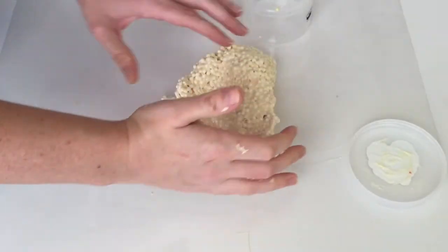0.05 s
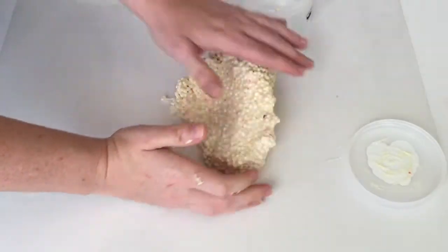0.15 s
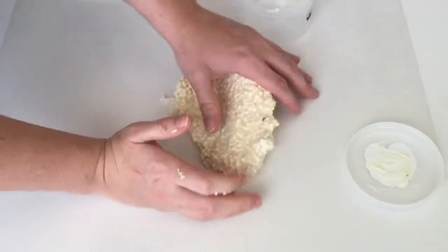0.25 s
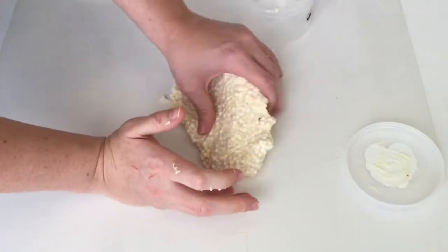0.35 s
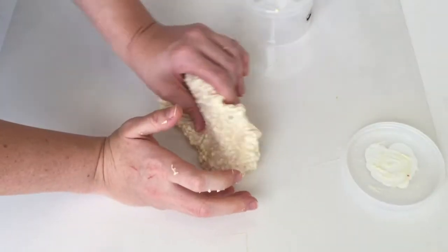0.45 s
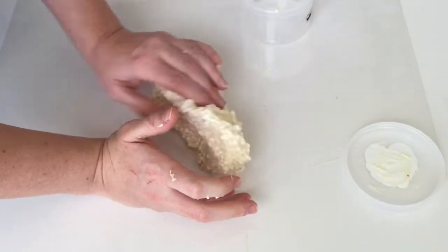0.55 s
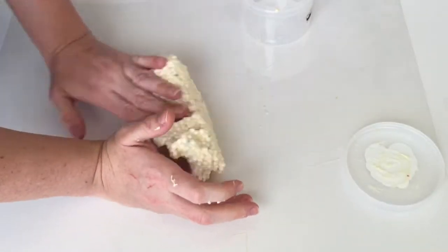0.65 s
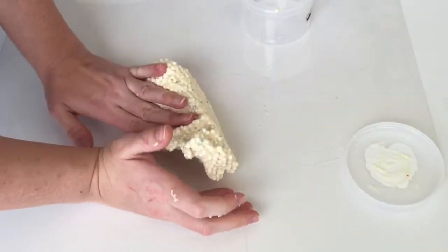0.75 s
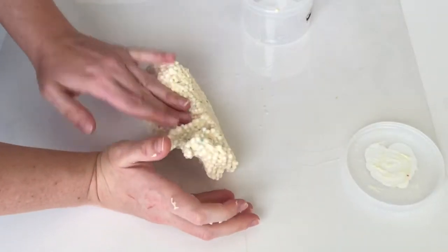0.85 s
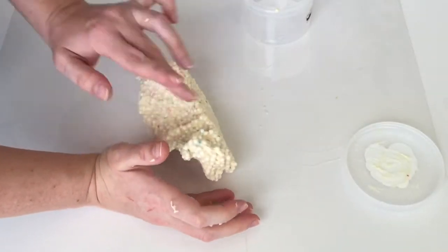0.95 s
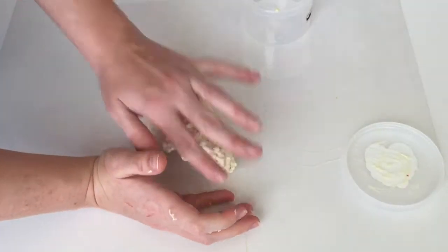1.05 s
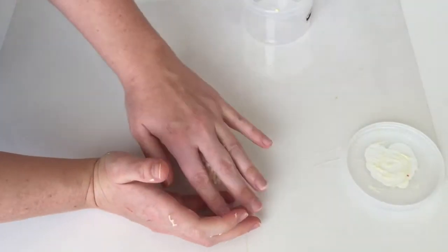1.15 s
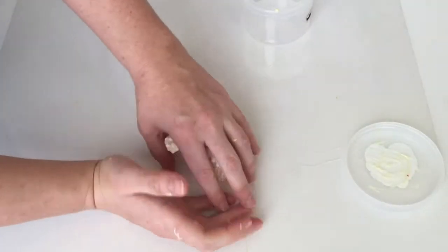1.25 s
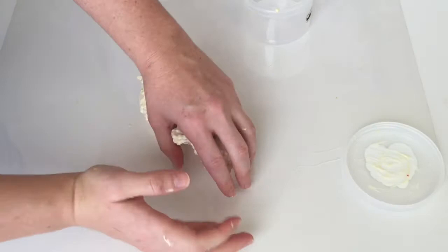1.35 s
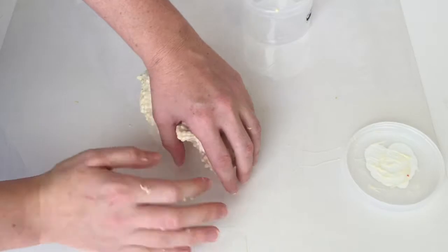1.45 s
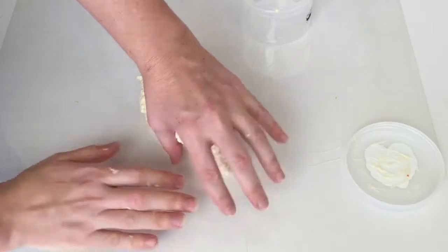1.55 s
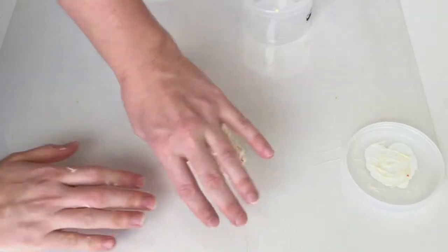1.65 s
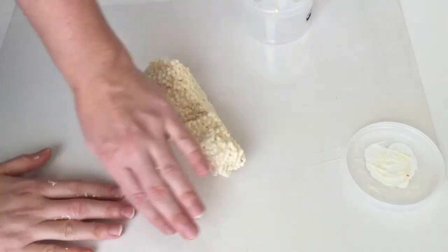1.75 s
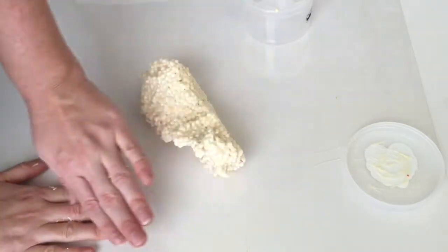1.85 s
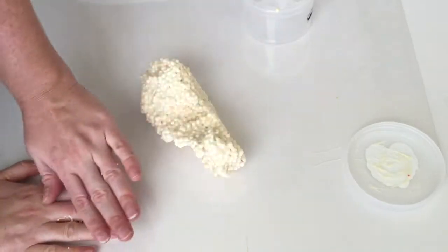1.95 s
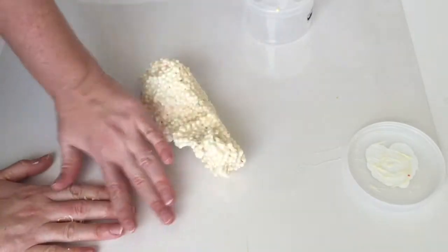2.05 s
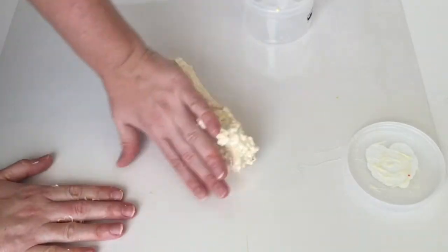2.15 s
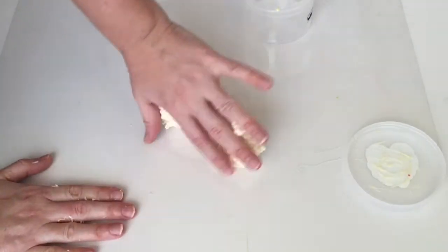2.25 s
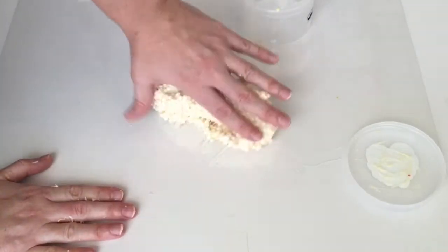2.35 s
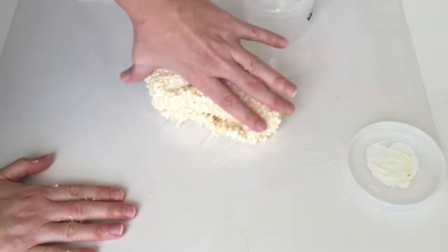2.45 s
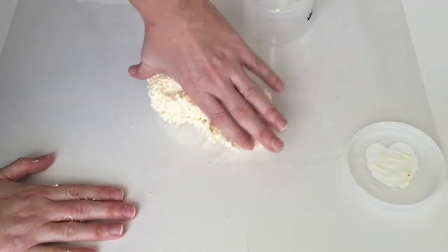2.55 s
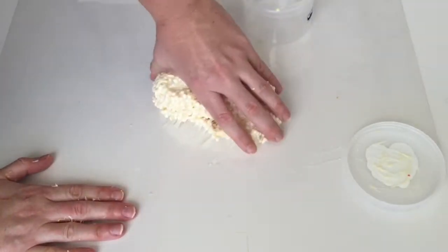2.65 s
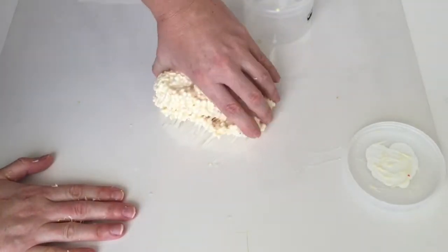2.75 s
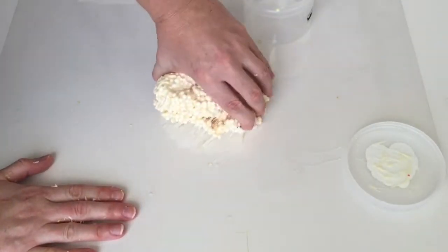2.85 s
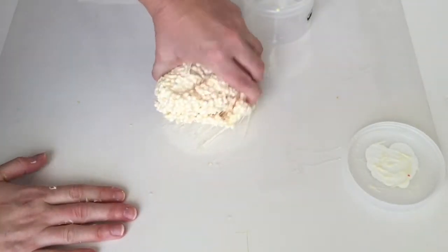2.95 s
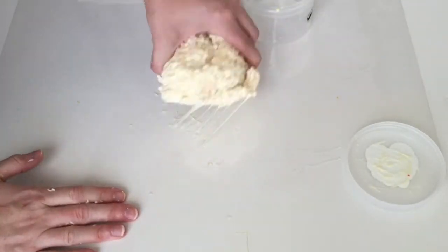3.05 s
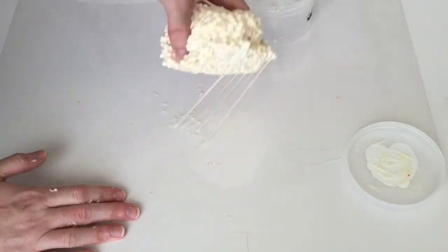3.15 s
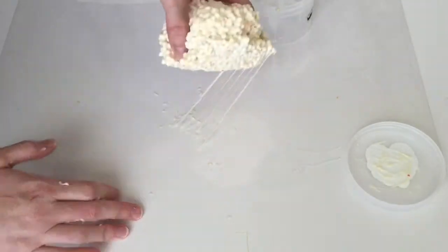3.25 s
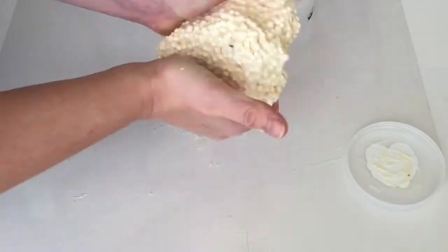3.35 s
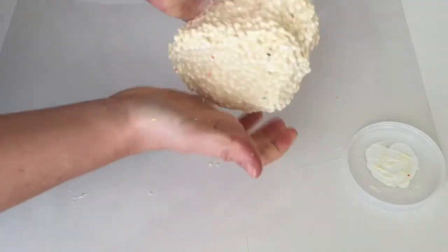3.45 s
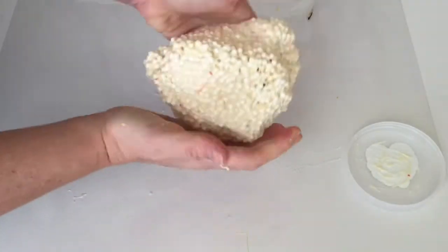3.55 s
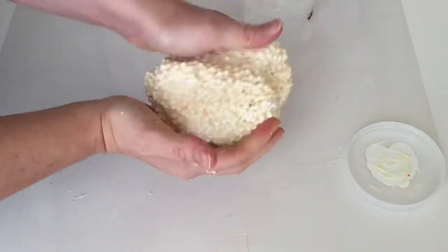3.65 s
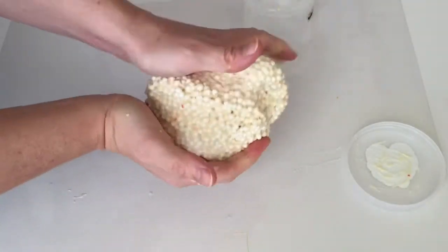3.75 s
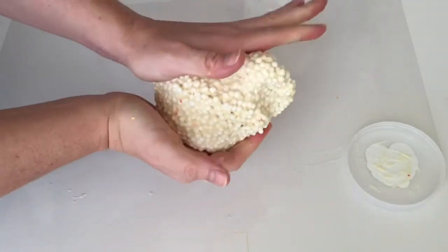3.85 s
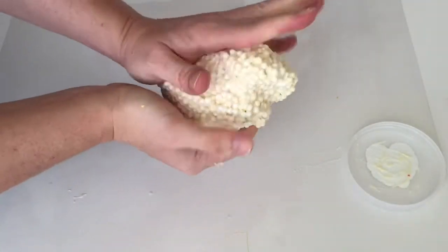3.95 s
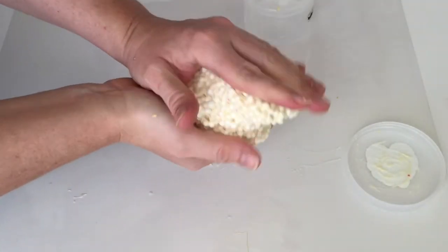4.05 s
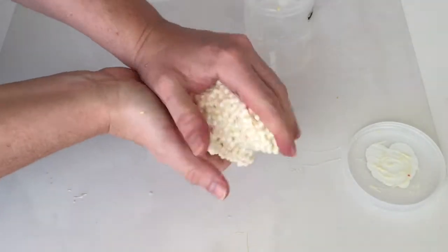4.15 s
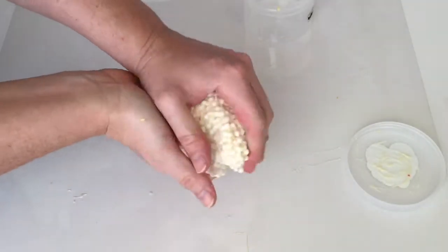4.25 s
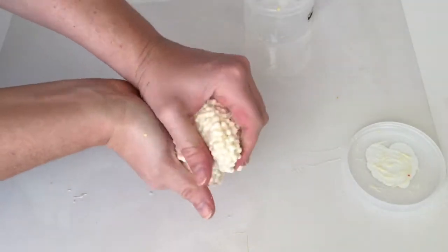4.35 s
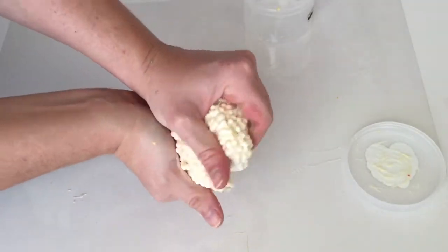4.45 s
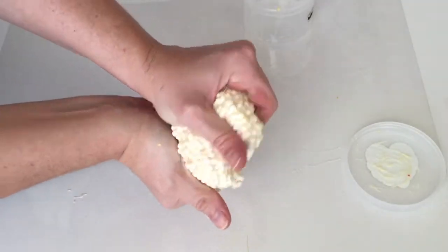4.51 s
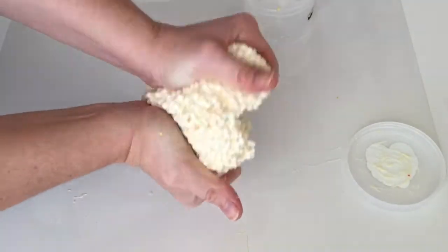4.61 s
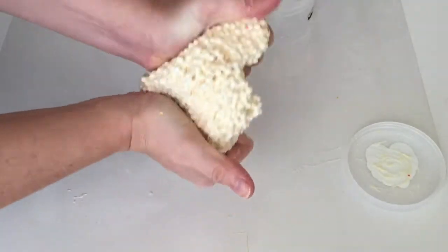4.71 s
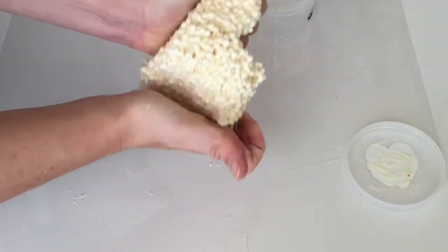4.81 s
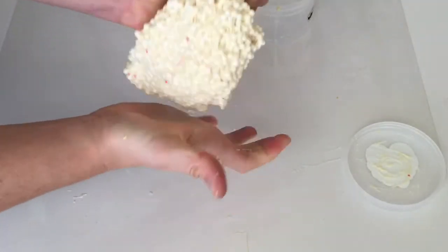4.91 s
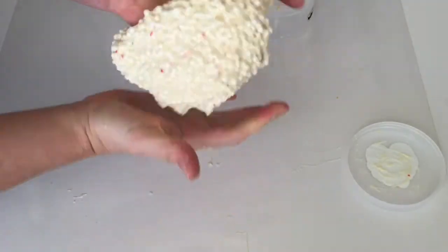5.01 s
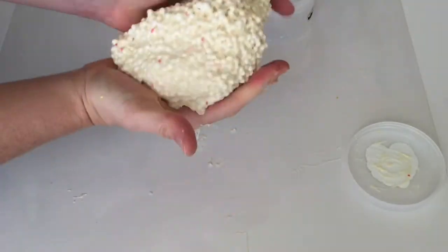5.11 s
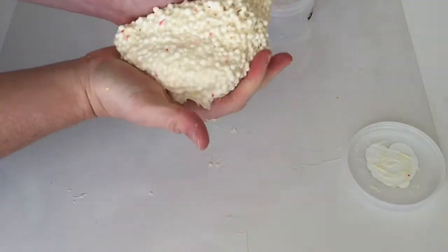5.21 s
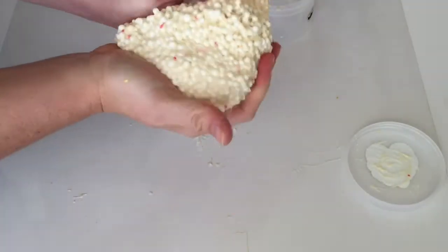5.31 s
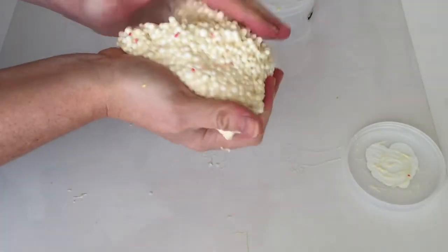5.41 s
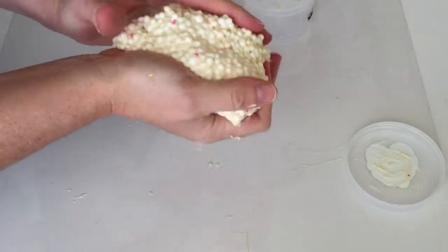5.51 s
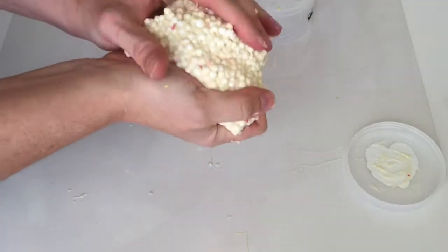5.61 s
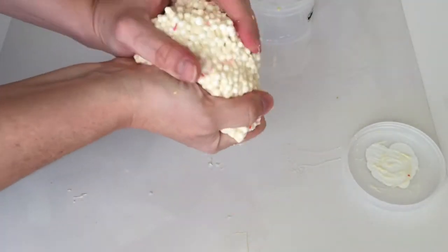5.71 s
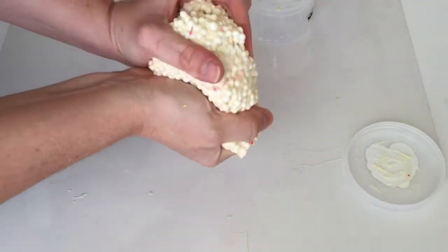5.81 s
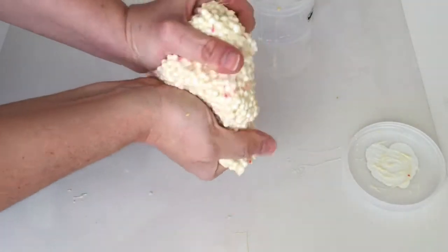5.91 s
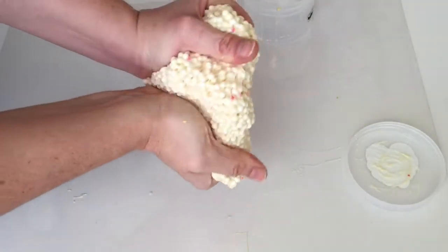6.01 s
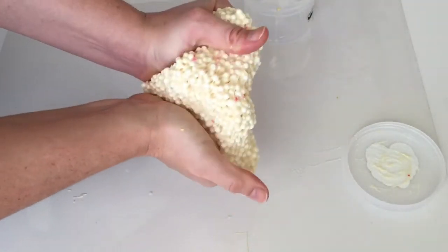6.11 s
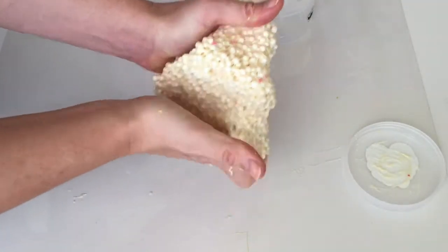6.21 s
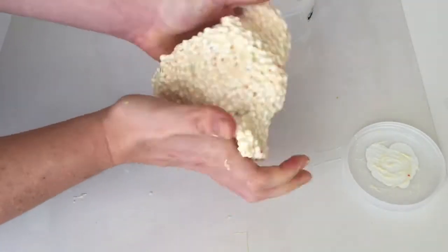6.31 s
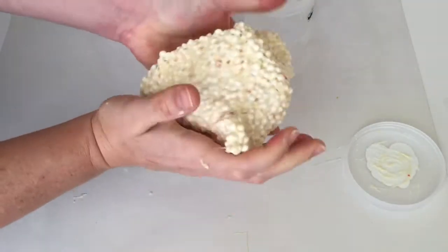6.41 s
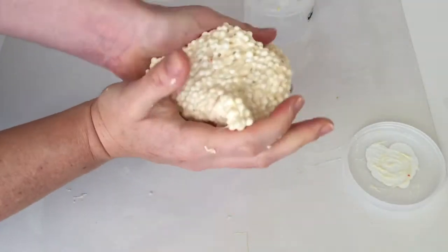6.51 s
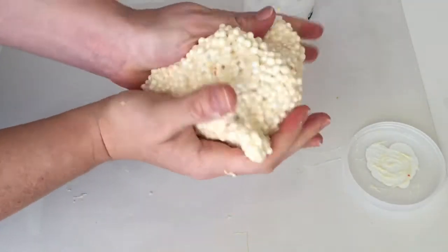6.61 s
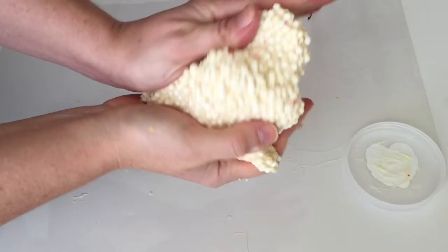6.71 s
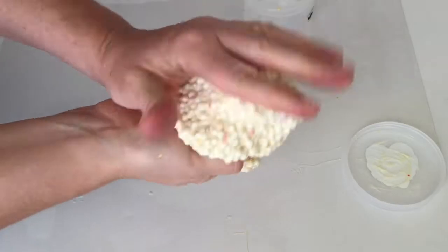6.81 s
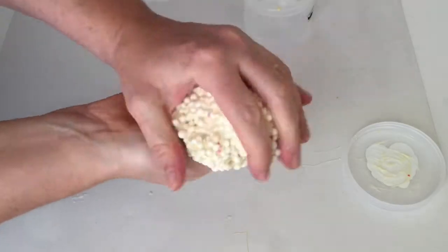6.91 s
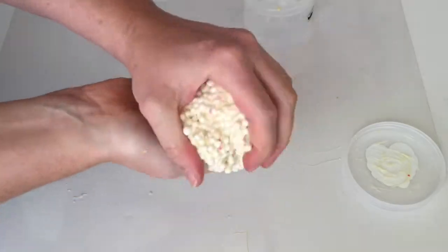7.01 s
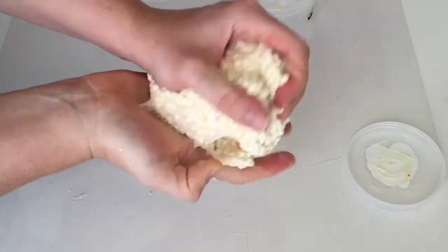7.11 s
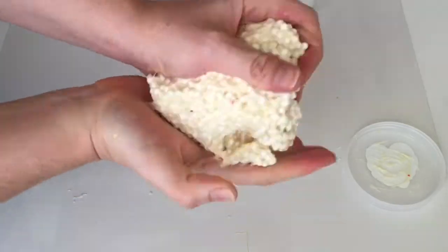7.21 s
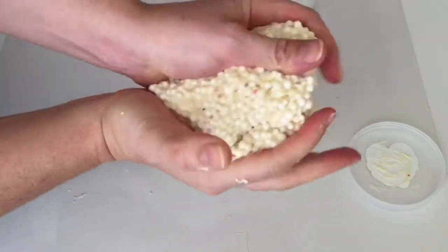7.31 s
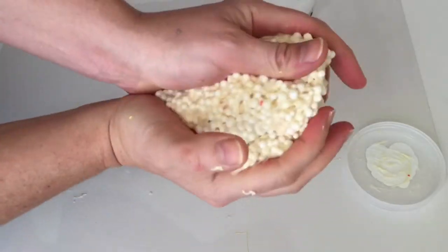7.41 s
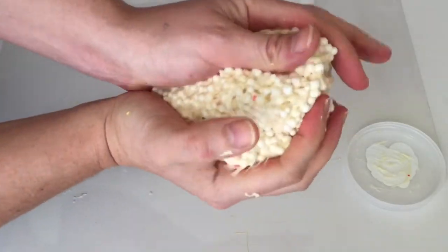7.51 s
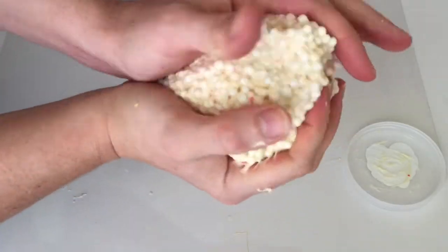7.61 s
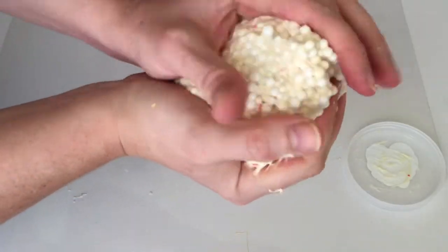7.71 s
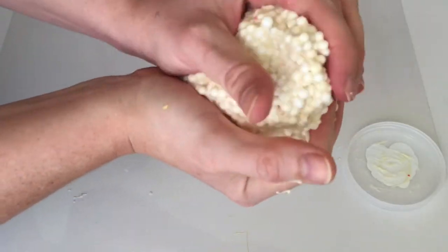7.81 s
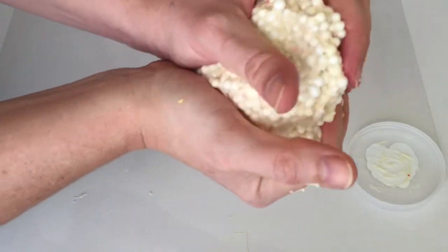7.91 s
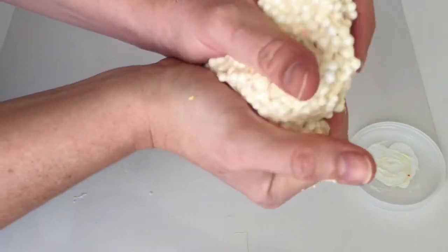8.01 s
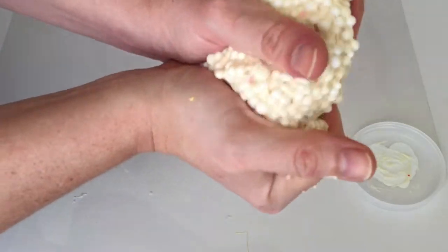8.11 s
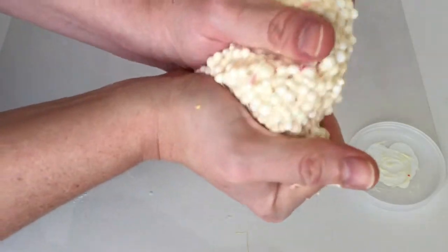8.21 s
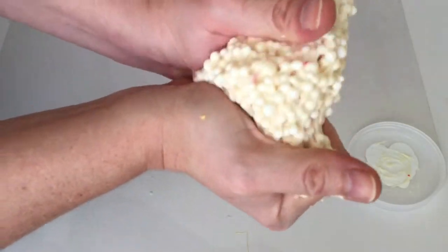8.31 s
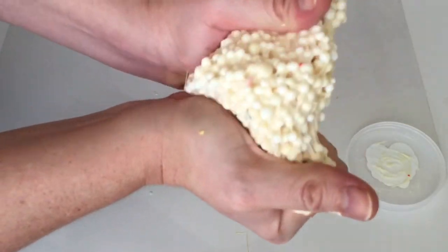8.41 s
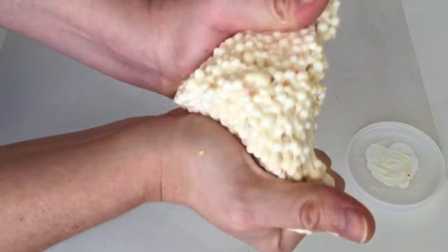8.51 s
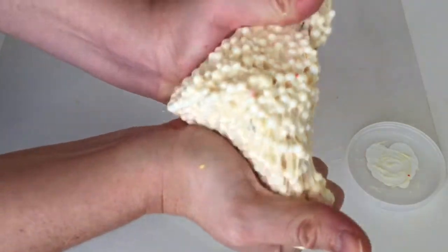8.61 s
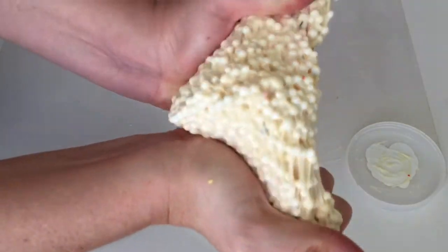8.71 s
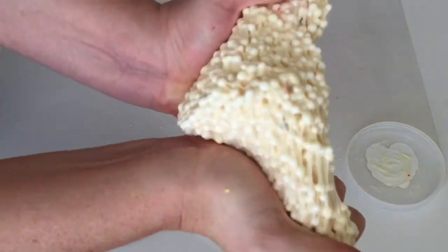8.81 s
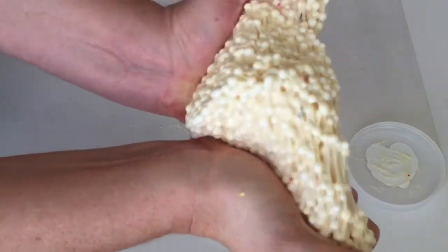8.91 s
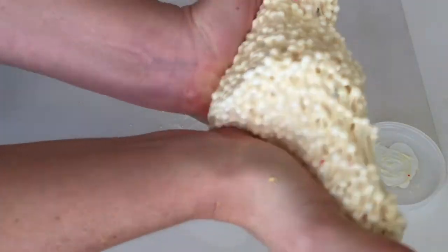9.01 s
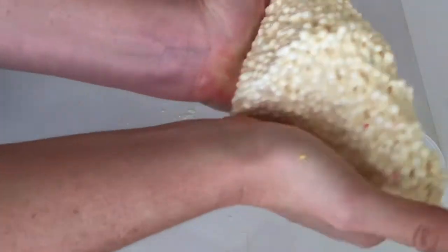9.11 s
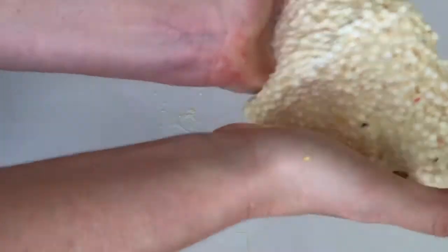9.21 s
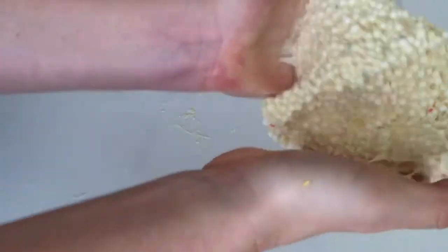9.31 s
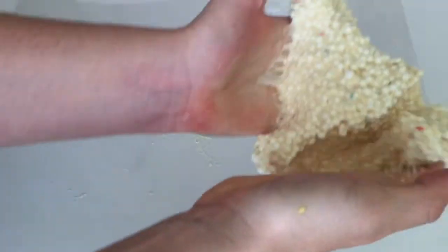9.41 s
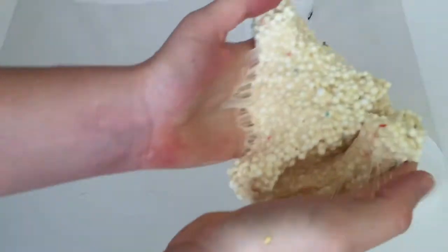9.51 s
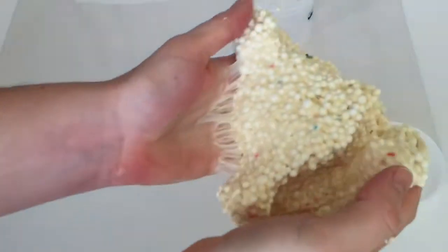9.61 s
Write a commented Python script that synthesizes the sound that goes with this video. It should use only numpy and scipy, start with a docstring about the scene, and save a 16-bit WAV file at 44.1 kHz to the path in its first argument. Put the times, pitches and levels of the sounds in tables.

```python
"""A quiet room, close to a phone microphone: hands knead bead-filled slime over a table.
Films between foam beads snap as short chains of decaying sine notes, over a crackle of thousands of tiny ones.
Filtered pushes make the table thud; wet hollows plop, pin-holes whistle, and a pocket buzzes in puffs of air.
Echoes and a fading noise tail are the walls' answer; shaped noise and a wavering hum are the room itself."""
import sys
import numpy as np
from scipy import signal
from scipy.fft import rfft, irfft, next_fast_len
from scipy.io import wavfile
from scipy.ndimage import map_coordinates

SR = 44100
rng = np.random.default_rng(int(sys.argv[2]) if len(sys.argv) > 2 else 0)


def unload_wav(signal):
    """Save mono or channel-first audio to the path in sys.argv[1] as 16-bit WAV at rate SR, clipped to [-1, 1]."""
    wavfile.write(
        sys.argv[1],
        SR,
        np.round(np.clip(np.atleast_2d(signal).T, -1, 1) * 32767).astype(np.int16),
    )


N = 425990  # length in samples

# The room's background noise, as a relative spectrum: pitch_hz, level_db
ROOM_NOISE = [(15, -44), (25, -28.5), (40, -10), (58, -1.5), (90, -4.5), (170, -17), (330, -20), (500, -22),
              (1000, -25), (3000, -28), (6000, -31.5), (10000, -35.5), (16000, -47)]
# How long the walls ring at each pitch: pitch_hz, time_to_fall_60_db_s
WALLS = [(200, 0.13), (2000, 0.1), (6000, 0.063), (15000, 0.012)]
# Near reflections from hands, table and wall: delay_s, level_db
ECHOES = [(.0011, -34), (.003, -24.5), (0.01, -35.5)]
# The microphone's tone: pitch_hz, gain_db
MIC_TONE = [(300, 1), (650, -3), (1050, 1), (1500, -2), (2700, 2), (3600, -1), (4600, -3), (6500, 2),
            (7350, -4), (8300, 1), (10400, -4), (11500, 0)]
MIC_LOW_HZ, TOP_HZ = 120, 15800  # slime sound weakens below the first; nothing is kept above the second

# Squeezes and pulls: full_force_s, held_s, thin_film_crackle_db, large_pocket_crackle_db
SQUEEZES = [(0, 0, -75.5, -62.5), (0.2, 0.0049, -66, -53.5), (0.412, 0.081, -37.5, -36),
            (0.485, 0.01, -24, -31), (0.629, 0.058, -41.5, -45.5), (0.76, 0.028, -53, -52),
            (0.877, 0.0043, -47, -50.5), (1.295, 0.0055, -84, -56.5), (2.197, 0.046, -48, -45.5),
            (2.303, 0.067, -50, -44), (2.465, 0.057, -60.5, -60.5), (2.59, 0.00072, -54.5, -62),
            (2.679, 0.096, -48.5, -50), (2.82, 0.124, -55, -52.5), (2.955, 0.044, -43, -44.5),
            (3.02, 0.0071, -41, -34), (3.09, 0.11, -69.5, -51), (3.21, 0.0053, -74, -45.5),
            (3.305, 0, -68, -59), (3.38, 0.0089, -32.5, -35.5), (3.45, 0.0079, -39.5, -49.5),
            (3.58, 0.0041, -52, -61), (3.655, 0, -48.5, -65), (3.713, 0, -43, -49), (3.82, 0.025, -51, -57),
            (3.998, 0.075, -53.5, -64), (4.235, 0.0018, -45.5, -54.5), (4.31, 0.022, -42.5, -55.5),
            (4.418, 0.094, -44.5, -55), (4.534, 0.051, -45.5, -55.5), (4.614, 0.041, -46.5, -55),
            (4.801, 0.02, -33, -40.5), (4.875, 0.000014, -35, -40), (4.998, 0.013, -41, -51.5),
            (5.148, 0.0075, -37, -51), (5.275, 0.041, -55.5, -67), (5.388, 0.00084, -43.5, -59),
            (5.445, 0, -37, -48.5), (5.52, 0.066, -49.5, -61), (5.62, 0.068, -43, -60),
            (5.745, 0.098, -36.5, -62), (5.865, 0.089, -44.5, -55.5), (5.985, 0.075, -47.5, -62),
            (6.181, 0.056, -34.5, -41), (6.271, 0.041, -37, -45), (6.475, 0.033, -50.5, -53.5),
            (6.662, 0.0091, -51, -73), (6.75, 0.042, -46, -55.5), (6.87, 0.012, -51.5, -55.5),
            (6.937, 0.049, -49.5, -60.5), (7.064, 0.058, -40, -44), (7.193, 0.1, -46.5, -55),
            (7.36, 0.13, -50.5, -59.5), (7.47, 0.0042, -43, -50.5), (7.6, 0.036, -42.5, -51.5),
            (7.735, 0.03, -49, -58.5), (7.84, 0.1, -54, -73), (7.92, 0.11, -61, -80),
            (8.035, 0.12, -47, -63), (8.231, 0.033, -44, -62), (8.295, 0.15, -55.5, -67),
            (8.492, 0.096, -53, -62.5), (8.675, 0.028, -49.5, -57.5), (8.774, 0.059, -49.5, -62.5),
            (8.93, 0.16, -65, -69.5), (9.07, 0.02, -53.5, -63), (9.125, 0.12, -41.5, -43.5),
            (9.225, 0.066, -42.5, -44), (9.3, 0.058, -40, -48), (9.455, 0.049, -54, -57),
            (9.575, 0, -50.5, -52)]
RISE_DB_PER_S, FADE_DB_PER_S = 484, 291  # force builds fast, the mass settles more slowly
SHAKE_END_S = 2.5  # table shaking stops and sparse single snaps join the crackle
FILM_HZ = 9100  # typical pitch of the thin films
# Typical ring of the pockets as the hands open and cup: time_s, pitch_hz
POCKET_PITCH = [(0.3, 2420), (0.5, 2010), (0.75, 2580), (2.75, 2660), (3.02, 2255), (3.1, 2950),
                (3.32, 2950), (3.4, 2265), (9.2, 2183)]
# Resonances of the table top: pitch_hz, width_hz, level_db
TABLE_MODES = [(72, 24, -2), (120, 25, -5), (285, 40, -5)]

# Bursting pockets: start_s, level_db, film_pitch_hz, pocket_ring_db (relative to level_db)
POPS = [(0.1756, -47.5, 2406, -2), (0.196, -38.5, 2200, 9.5), (0.26, -42.5, 8500, -25),
        (0.298, -52, 2200, -10), (0.3165, -46.5, 2080, 5), (0.337, -49, 2500, -10),
        (0.3783, -28.5, 2420, -12), (0.386, -25, 2080, -9), (0.4052, -21, 2120, 4), (0.4297, -21, 2550, -8),
        (0.44, -17, 2520, -19), (0.449, -18.5, 2470, -12), (0.465, -1.5, 8850, -24),
        (0.4849, -27.5, 1716, -12), (0.4915, -6.5, 6620, -24), (0.517, -20.5, 2500, -12),
        (0.5239, -27.5, 1850, -12), (0.569, -33, 2234, -10), (0.6063, -35, 2000, 0),
        (0.641, -31, 2040, -18), (0.6556, -29.5, 2480, -12), (0.6766, -24.5, 2400, -24),
        (0.687, -24.5, 2500, -12), (0.721, -31, 2520, -12), (0.7664, -30, 2760, -17),
        (0.8611, -43, 2120, -11), (0.9024, -17, 10120, -8), (1.1604, -48.5, 4530, -22),
        (1.284, -48.5, 2280, -5), (1.3281, -42.5, 2850, -8), (1.3704, -44.5, 2900, -8),
        (1.4744, -49, 2450, -19), (1.5642, -21, 5850, -13), (1.7882, -40.5, 2240, 1),
        (2.1652, -19, 11150, -19), (2.1792, -31, 2760, -12), (2.1907, -35, 2370, 8.5),
        (2.195, -23, 2480, -12), (2.2147, -24, 2370, -4), (2.227, -28, 2580, -10),
        (2.2384, -28.5, 2360, -10), (2.288, -32.5, 2316, -2), (2.3104, -23.5, 2150, -15),
        (2.3215, -22, 4570, 7), (2.336, -29, 2470, -10), (2.358, -31, 2460, -10), (2.3667, -27, 2800, -12),
        (2.4217, -33, 4500, 1), (2.4606, -36, 6500, -13), (2.6524, -34, 6500, -6), (2.668, -23, 7500, -26),
        (2.674, -27.5, 5000, -15), (2.7114, -39.5, 2560, -12), (2.7236, -32, 2500, -12),
        (2.7646, -29.5, 2420, -17), (2.9635, -31, 3000, -10), (2.973, -25, 7000, -15),
        (3.013, -24.5, 2150, -15), (3.032, -18, 2105, -8), (3.0801, -32, 2200, -10),
        (3.1012, -30, 2840, -15), (3.1352, -37, 2800, -15), (3.1506, -33, 2650, -15),
        (3.1762, -49, 2780, -15), (3.197, -42, 2730, -13), (3.2078, -27.5, 3500, -6),
        (3.2993, -32, 2960, -10), (3.3116, -41, 2530, -12), (3.343, -30.5, 5000, -18),
        (3.3568, -31, 2150, -10), (3.364, -15.5, 8800, -1), (3.377, -22, 8490, -15),
        (3.387, -10.5, 6000, -7), (3.395, -13.5, 6360, -24), (3.4463, -13.5, 8500, -21),
        (3.4992, -18.5, 15050, -16), (3.893, -26, 5500, -24), (3.9052, -7, 5550, -23), (4.0, -47, 2420, -8),
        (4.013, -31, 5500, -10), (4.0415, -23.5, 6800, -30), (4.165, -32, 5000, -1),
        (4.1781, -18.5, 11700, -10.5), (4.226, -32, 5470, -15), (4.15, -37, 7000, -13),
        (4.2408, -18, 9800, -7), (4.2598, -19.5, 4070, -4), (4.3094, -21, 5600, -29),
        (4.344, -29, 14700, -26), (4.4525, -40, 6120, -21), (4.487, -19, 6360, -22),
        (4.5363, -3.5, 7700, -53), (4.5715, -21, 6790, -26), (4.6184, -30, 6800, -10),
        (4.651, -29, 7100, -25), (4.813, -12, 6950, -7), (4.869, -18, 3360, -2), (4.8817, -16.5, 5960, -24),
        (4.9402, -13.5, 8400, -10), (5.013, -13.5, 5900, -22), (5.1327, -30.5, 6340, 10),
        (5.1566, -19.5, 7150, -7), (5.333, -24, 4500, 0.5), (5.3786, -27.5, 8040, -20),
        (5.3976, -25.5, 6850, -5), (5.4195, -26.5, 6760, -22), (5.4334, -30.5, 6720, -17),
        (5.4442, -17, 5450, -17), (5.476, -13, 6900, -31), (5.4878, -17, 7000, -6.5),
        (5.5127, -15, 12400, -32), (5.5874, -20, 9600, -24), (5.6148, -19.5, 8020, -9),
        (5.6535, -20.5, 6750, -27), (5.7007, -12.5, 7200, -9), (5.733, -5, 6440, -29),
        (5.7605, -16, 6900, -4), (5.7888, -28, 6200, -26), (5.832, -17.5, 6300, -12),
        (5.8655, -12, 6380, -38), (5.8771, -6, 8630, -38), (5.9307, -12, 11100, -31),
        (5.9493, -28, 11150, -20), (6.0094, -23.5, 6690, -18), (6.0327, -18.5, 6400, -29),
        (6.1568, -25, 7000, -23), (6.2217, -23, 6300, 10), (6.2337, -8, 11200, -13),
        (6.278, -32, 5670, -18), (6.2987, -13, 6600, -3.5), (6.3313, -18, 6470, -10),
        (6.6432, -34, 2480, -11), (6.6604, -23, 12580, -6), (6.8041, -19, 14900, -33),
        (6.873, -16.5, 13800, -45), (6.925, -27, 7000, -6), (6.9394, -29, 8310, -15),
        (6.9634, -28.5, 8030, -15), (7.0529, -27, 5820, -12), (7.114, -12.5, 7160, -22),
        (7.1238, -21, 6160, -18), (7.1682, -21.5, 6430, -14), (7.2146, -27, 5500, -5),
        (7.2765, -30.5, 8630, -20), (7.291, -27.5, 6420, -15), (7.328, -16, 9900, -41),
        (7.36, -20, 12700, -33), (7.371, -27.5, 3540, -8), (7.392, -17, 5020, -18),
        (7.4244, -26.5, 12060, -17), (7.4643, -28, 7000, -25), (7.5775, -16.5, 12300, -16),
        (7.6315, -17.5, 9600, -10), (7.6495, -18, 9450, -36), (7.6687, -26, 8030, -32),
        (7.691, -15.5, 9000, -36), (7.749, -21, 9980, -17), (7.7935, -28, 5370, -26),
        (7.8079, -24, 9870, -33), (7.8391, -17, 12370, -44), (7.898, -21.5, 13600, -17),
        (7.927, -25, 11370, -36), (7.9982, -20.5, 13870, -9), (8.021, -28.5, 3600, -10),
        (8.04, -14, 10880, -9), (8.0474, -11, 6550, -19), (8.054, -9.5, 4600, -7),
        (8.1013, -12.5, 8270, -21), (8.174, -9, 6900, -20), (8.218, -32, 7000, -20),
        (8.2262, -14, 5800, -11), (8.2372, -17, 9500, -15), (8.3864, -27, 6900, -13),
        (8.4031, -20.5, 5500, -6.5), (8.4234, -19.5, 12500, -33), (8.4868, -25.5, 12500, -11),
        (8.6915, -24.5, 12640, -44), (8.7175, -19, 12200, -13), (8.7504, -13, 8600, -30),
        (8.7856, -14.5, 5750, -10), (8.8106, -34, 3750, -5), (9.095, -25.5, 4570, -6),
        (9.116, -37, 2700, -8), (9.136, -33.5, 2240, 1), (9.146, -26, 2290, -3), (9.16, -28.5, 2340, -1),
        (9.169, -25.5, 4250, -3), (9.191, -32, 4500, -10), (9.201, -30.5, 2680, -10),
        (9.2182, -8.5, 12120, -10), (9.233, -16, 6440, -19), (9.2463, -31.5, 12800, -21),
        (9.26, -35, 2150, -3), (9.2685, -31, 5280, -25), (9.2818, -19, 6540, -20), (9.2958, -27, 8130, 3),
        (9.312, -17.5, 8280, -31.5), (9.362, -36, 3460, -10), (9.3735, -18, 5730, -1),
        (9.397, -14.5, 6960, -26), (9.4172, -7.5, 6770, -19), (9.4703, -23, 7000, -30),
        (9.477, -30, 5500, -20), (9.6, -21.5, 5740, -18)]
CHAIN_DB, CHAIN_S = -13, 0.0057  # later links of a tear: base level under the first snap, longest delay
CHAIN_DB_PER_OCTAVE, THICK_HZ = 9, 4500  # films below THICK_HZ tear raggedly: stronger links per octave down
CLEAN_BREAK, TYPICAL_DB = 0.084, -13  # each dB above typical takes this many dB off the tearing
RING_UNDER_FILM = 0.8  # a pocket's typical ring is at most this share of its film's pitch
TICK_HZ, TICK_DB, TICK_DB_PER_OCTAVE = 11000, -3.5, 4  # tick under the snap, weaker per octave of lower film
# Crackle left by a burst: level relative to its peak, level relative to its ring, and how fast it fades
AFTER_DB, AFTER_RING_DB, AFTER_FADE_DB_PER_S = -35, -27, 450

# Presses on the table: start_s, level_db
THUDS = [(0.191, -28), (0.87, -40.5), (1.237, -49.5), (1.8, -46), (2.302, -40), (3, -40.5), (3.041, -43),
         (3.199, -43), (3.262, -53)]
# A faint hiss while a hand glides past: start_s, held_s, level_db
HISS = (1.5, 0.59, -69)
# Tone of that hiss: pitch_hz, width_hz, level_db
HISS_BANDS = [(2040, 780, -4), (3050, 270, 1), (5260, 1700, -7)]
# Large wet hollows: start_s, level_db, pitch_hz
PLOPS = [(2.89, -34, 733), (7.052, -33, 910), (7.257, -38.5, 600), (7.464, -36.5, 890), (7.652, -45, 610),
         (7.899, -52, 364), (7.999, -46, 884), (8.056, -33, 586), (8.173, -39.5, 625), (8.225, -40.5, 585),
         (8.525, -38, 826), (9.576, -41.5, 855)]
# Pin-hole whistles and clear bubbles: start_s, pitch_hz, length_s, level_db
SQUEAKS = [(4.098, 2360, 0.004, -37), (5.554, 2130, 0.0031, -29.5), (5.774, 6030, 0.014, -25.5),
           (5.799, 3610, 0.02, -41.5)]
# A brief dip of the whole sound: middle_s, half_width_s, depth_db
DIP = (4.4, 0.018, -20)
# Air leaking from a pocket: time_s, puffs_per_s, level_db (before the leak's final gain)
BUZZ = [(8.245, 93, -50), (8.27, 91, -46), (8.31, 91, -46), (8.325, 120, -44.5), (8.355, 140, -43.5),
        (8.38, 150, -52), (8.4, 61, -53)]
# Resonances of the leaking pocket: pitch_hz, width_hz, level_db
LEAK_MODES = [(630, 170, 0), (926, 200, 0), (1740, 160, -4), (2550, 250, -5), (3320, 200, -14)]
# An arm knocks the phone's support: start_s, level_db, pitch_hz
BUMPS = [(8.93, -53, 48), (9.31, -51.5, 42)]


def amp(db):
    """Turn decibels into a plain multiplier."""
    return 10 ** (np.asarray(db) / 20)


def unit(x):
    """Scale a sound to an average strength (rms) of 1."""
    return x / np.sqrt(np.mean(x ** 2) + 1e-20)


def along(points, hz):
    """Read values between (pitch_hz, value) points, on a log pitch axis."""
    f, v = np.transpose(points)
    return np.interp(np.log(hz + 1), np.log(f + 1), v)


def curves(rows):
    """One value per sample for each column after the time; -120 outside the rows."""
    s, *columns = np.transpose(rows)
    return [np.interp(np.arange(N) / SR, s, c, -120, -120) for c in columns]


def wobble(rate):
    """A smooth random curve with this many random points a second."""
    points = rng.standard_normal(int(N * rate / SR) + 4)
    return map_coordinates(points, [np.arange(N) * rate / SR])


def filtered(x, response):
    """Shape a sound with a gain that depends on frequency."""
    m = next_fast_len(N + SR // 2)
    return irfft(rfft(x, m) * response(np.fft.rfftfreq(m, 1 / SR)), m)[:N]


def modes(table):
    """Add up resonances, each a body that rings around its own pitch."""
    def response(f):
        total = 0
        for k, (hz, width, db) in enumerate(table):
            resonance = 1j * f * width / (hz * hz - f * f + 1j * f * width)
            total = total + (-1) ** k * amp(db) * resonance  # alternate signs
        return total
    return response


def grains(s, hz, cycles, size, length):
    """Short sine notes with a soft start; each decays by about 9 dB in the given number of cycles."""
    n = np.arange(length)
    turns = np.clip(hz, 150, 16000)[:, None] * n / SR
    envelope = np.exp(-turns / cycles) * (1 - np.exp(-2 * turns))
    wave = size[:, None] * np.sin(2 * np.pi * turns) * envelope
    at = np.round(s * SR).astype(int)[:, None] + n
    return np.bincount(at.ravel(), wave.ravel(), N + SR)[:N]


def crackle(count, centre_hz, spread, cycles, length):
    """Tiny bursts at random times, few strong and many weak, pitched around centre_hz; rms 1."""
    u, z = rng.random((count, 2)), rng.standard_normal((count, 2))
    size = (1.003 - u[:, 1]) ** -.3 * np.sign(z[:, 1])
    s = u[:, 0] * N / SR
    hz = centre_hz(s) * np.exp(spread * z[:, 0])
    return unit(grains(s, hz, cycles, size, length))


def swells(s, held, levels_db, rise, fade):
    """One gain per row of levels_db that rises to each event, holds and fades; events add in power."""
    step = 64  # samples between computed points
    t = np.arange(0, N + step, step) / SR
    before = np.clip(s[:, None] - t, 0, None)
    after = np.clip(t - (s + held)[:, None], 0, None)
    loss_db = rise * before + fade * after
    power = amp(2 * np.asarray(levels_db)) @ amp(-2 * loss_db)
    return np.array([np.interp(np.arange(N) / SR, t, np.sqrt(p)) for p in power])


def background():
    """House rumble that comes and goes, steady microphone hiss, and a wavering mains hum."""
    noise = unit(filtered(rng.standard_normal(N), lambda hz: amp(along(ROOM_NOISE, hz))))
    rumble = filtered(noise, lambda hz: 1 / (1 + (hz / 220) ** 4))
    waver = amp(4.5 * wobble(5)) * np.exp(.9j * wobble(6))  # level and phase both wander
    hum = amp(-69) * np.imag(waver * np.exp(2j * np.pi * 119.5 * np.arange(N) / SR))
    swell = amp(3 * wobble(7))
    steady = noise - rumble
    return amp(-65.5) * (steady + amp(2.0) * swell * rumble) + hum


def pocket_hz(s):
    """Typical pocket pitch at times s."""
    return np.interp(s, *np.transpose(POCKET_PITCH))


def working():
    """How hard films and pockets crackle: each squeeze drives them, and each burst leaves a short crackle."""
    s, held, *levels_db = np.transpose(SQUEEZES)
    squeezed = swells(s, held, levels_db, RISE_DB_PER_S, FADE_DB_PER_S)
    at, db, _, ring_db = np.transpose(POPS)
    db = db - CLEAN_BREAK * (db - TYPICAL_DB)
    after_db = [db + AFTER_DB, db + ring_db + AFTER_RING_DB]
    after = swells(at, 0 * at, after_db, 5000, AFTER_FADE_DB_PER_S)
    return np.hypot(squeezed, after)


def kneading():
    """Pockets crackle low, thin films tick high, the wet mass squelches and at first shakes the table."""
    # bursts set off their neighbours, so shared random swells gather them in clumps
    clumps, wander = wobble(55), wobble(11)

    def film_hz(s):  # film sizes change from fold to fold
        return FILM_HZ * np.exp(0.27 * wander[(s * SR).astype(int)])

    pockets = crackle(count=12000, centre_hz=pocket_hz, spread=.3, cycles=2.2, length=300)
    films = crackle(count=18000, centre_hz=film_hz, spread=0.37, cycles=1.0, length=60)
    thinnest = crackle(count=20000, centre_hz=lambda s: 13000, spread=0.2, cycles=1.0, length=40)
    snaps = crackle(count=1300, centre_hz=lambda s: 7500, spread=.4, cycles=.6, length=50)
    snaps = snaps * (np.arange(N) > SHAKE_END_S * SR)  # sparse single snaps join in
    films = films + amp(-6.5) * thinnest + amp(-3) * snaps

    squelch = crackle(count=6000, centre_hz=lambda s: 1150, spread=0.336, cycles=2.4, length=600)
    heave = crackle(count=2500, centre_hz=lambda s: 330, spread=0.3, cycles=1.6, length=900)  # whole lump
    mass = pockets + amp(-11) * squelch + amp(-19.5) * heave
    wet = unit(mass * amp(1.9 * clumps + 1.2 * wobble(70)))
    fine = unit(films * amp(2.5 * clumps + 1.7 * wobble(70)))

    table = lambda f: modes(TABLE_MODES)(f) / (1 + (f / 330) ** 4)
    shake = unit(filtered(rng.standard_normal(N), table)) * (np.arange(N) < SHAKE_END_S * SR)
    high, low = working()
    return low * wet + high * fine, amp(-20.5) * low ** 0.79 * shake


def pops(count=9):
    """A film tears past the next beads in a short chain; each link has a snap, a pocket ring and a tick."""
    s, db, hz, ring_db = np.transpose(POPS)[..., None]
    z, u = rng.standard_normal((2, len(s), count)), rng.random((len(s), count))
    later = np.arange(count) > 0  # every link but the first snap
    start = (s + CHAIN_S * u * later).ravel()
    ragged_db = CHAIN_DB_PER_OCTAVE * np.log2(np.maximum(THICK_HZ / hz, 1))
    clean_db = CLEAN_BREAK * (db - TYPICAL_DB)
    # the later a link comes, the weaker it tends to be
    link_db = db + later * (CHAIN_DB + ragged_db - clean_db - 9 * u + 4.0 * z[0])

    def size(rel_db):
        return (np.sign(z[0]) * amp(link_db + rel_db)).ravel()

    def pitch(centre_hz, spread):
        return (centre_hz * np.exp(spread * z[1])).ravel()

    snap_cycles = np.repeat(1 + 2400 / hz, count)[:, None]  # low films ring longer
    snap = grains(start, pitch(hz, 0.28 * later), snap_cycles, size(3.8), 300)
    ring_hz = np.minimum(RING_UNDER_FILM * hz, pocket_hz(s))
    ring = grains(start, pitch(ring_hz, 0.33), 0.91, size(ring_db), 250)
    tick_db = TICK_DB + TICK_DB_PER_OCTAVE * np.log2(np.minimum(hz / TICK_HZ, 1))
    tick = grains(start, pitch(TICK_HZ, 0.28), 4.8, size(tick_db), 60)
    return snap + ring + tick


def thuds():
    """A soft palm pushes, then settles unevenly; the table top rings."""
    s, db = np.transpose(THUDS)
    t = np.arange(SR // 8) / SR
    settle = amp(-30.5 - 60 * t / 0.36) * rng.standard_normal(len(t))
    settle[0] = 1  # the push itself
    hits = np.bincount(np.round(s * SR).astype(int), amp(db + 55.0), N)  # gain makes up for the filter
    push = np.convolve(hits, settle)[:N]
    soften = lambda f: 1j * f / (45 + 1j * f) / (1 + 1j * f / 260) ** 3
    return filtered(push, lambda f: modes(TABLE_MODES)(f) * soften(f))


def hiss():
    """A faint airy noise with a narrow band in it swells and stops."""
    s, held, db = HISS
    gain, = swells(np.array([s]), held, [[db]], 40, 156)
    air = unit(filtered(rng.standard_normal(N), modes(HISS_BANDS)))
    return gain * amp(2.3 * wobble(16)) * air


def plops():
    """A large hollow collapses with a short low note."""
    s, db, hz = np.transpose(PLOPS)
    return grains(s, hz, 1.3, amp(db + 6.0), 1200)  # gain makes up for the soft start and decay


def squeaks():
    """Air whistles briefly and unsteadily through a pin-hole, with an overtone."""
    out = np.zeros(N)
    for s, hz, length, db in SQUEAKS:
        t = np.arange(round(length * SR)) / SR
        jitter = np.cumsum(0.078 * rng.standard_normal(len(t)))
        turn = 2 * np.pi * hz * t * (1 + 0.015 * t / length) + jitter  # pitch glides up slightly
        tone = np.sin(turn) + 0.26 * np.sin(2 * turn)
        out[round(s * SR):][:len(t)] += amp(db) * np.sin(np.pi * t / length) * tone
    return out


def leak():
    """The rim of a pocket flaps open and shut, each puff ringing the pocket; pulling changes its rate."""
    rate, db = curves(BUZZ)
    uneven_rate = np.clip(rate, 0, None) * (1 + 0.06 * wobble(80))
    puffs = np.diff(np.floor(np.cumsum(uneven_rate) / SR), prepend=0)  # one click per whole turn
    sound = filtered(puffs * amp(db + 0.99 * rng.standard_normal(N)), modes(LEAK_MODES))
    return amp(38.0) * sound


def bumps():
    """A knock on the support makes a dull low swing that dies in a few cycles."""
    out, t = np.zeros(N + SR), np.arange(SR // 4) / SR
    for s, db, hz in BUMPS:
        envelope = hz * t * np.exp(1 - hz * t)
        out[round(s * SR):][:len(t)] += amp(db) * np.sin(2 * np.pi * hz * t) * envelope
    return out[:N]


def room(x):
    """Add a few near reflections and a noise tail that dies faster in the treble."""
    hz, t, z = signal.stft(rng.standard_normal(SR // 2), SR, nperseg=256)
    decay = amp(-60 * t / along(WALLS, hz)[:, None])
    tail = signal.istft(z * decay, SR, nperseg=256)[1]
    answer = amp(-10) * tail / np.linalg.norm(tail)
    for delay, db in ECHOES:
        answer[round(delay * SR)] += amp(db)
    return x + signal.fftconvolve(x, answer)[:N]


def microphone(x):
    """Colour the sound as the capsule does, which hardly hears low airborne sound."""
    low_cut = lambda hz: (1j * hz / (MIC_LOW_HZ + 1j * hz)) ** 2
    return filtered(x, lambda hz: amp(along(MIC_TONE, hz)) * low_cut(hz))


def scene():
    """Mix airborne slime sounds with table, support and background; the whole level dips briefly."""
    crunch, shake = kneading()
    slime = microphone(room(pops() + plops() + squeaks() + crunch + leak() + hiss()))
    s, half_width, db = DIP
    dip = amp(db * np.exp(-((np.arange(N) / SR - s) / half_width) ** 4))
    return (dip * (slime + shake + thuds() + bumps() + background()))[None]


def record(dry):
    """The phone keeps nothing above its band limit."""
    return filtered(dry[0], lambda hz: hz < TOP_HZ)[None]


dry = scene()
out = record(dry)
unload_wav(out)
```